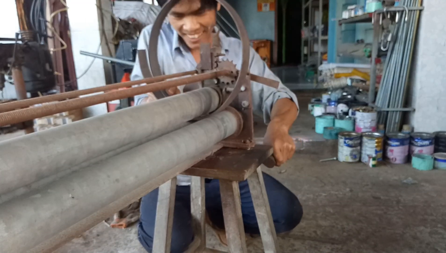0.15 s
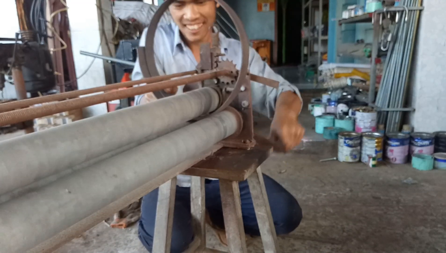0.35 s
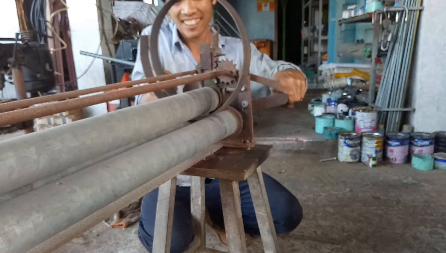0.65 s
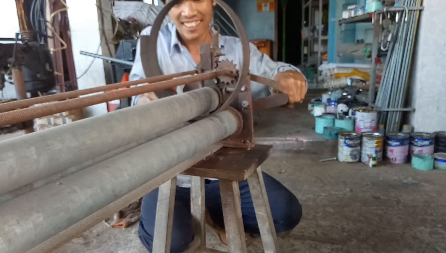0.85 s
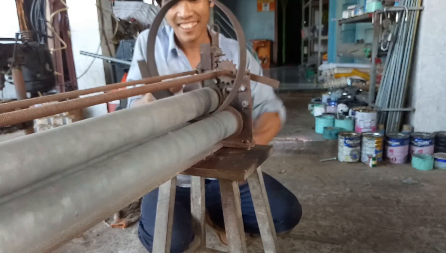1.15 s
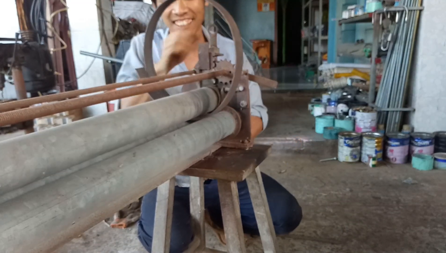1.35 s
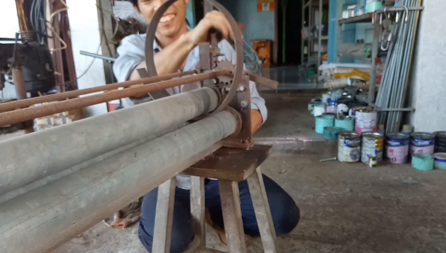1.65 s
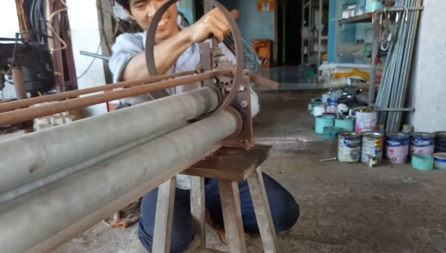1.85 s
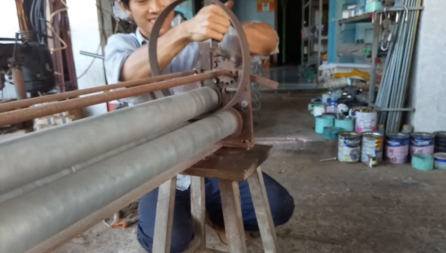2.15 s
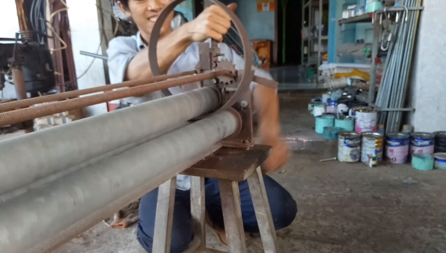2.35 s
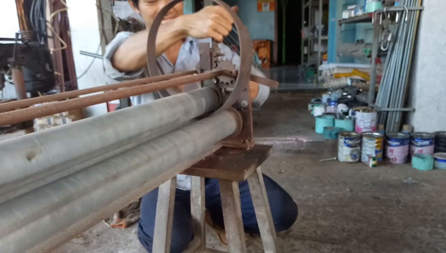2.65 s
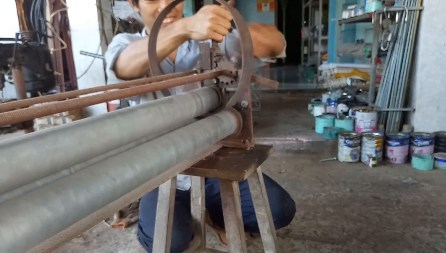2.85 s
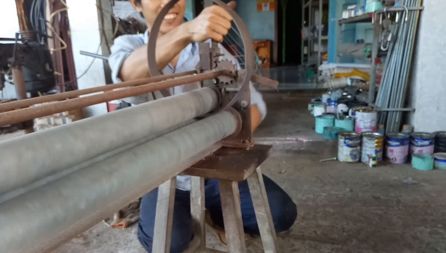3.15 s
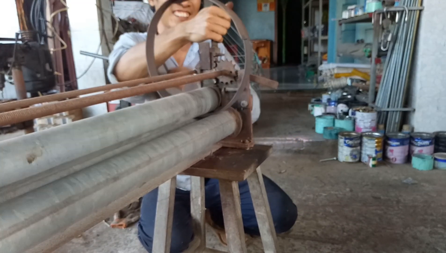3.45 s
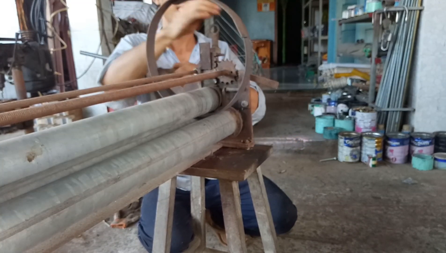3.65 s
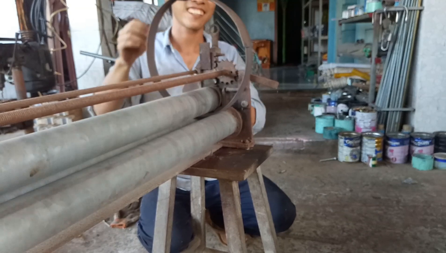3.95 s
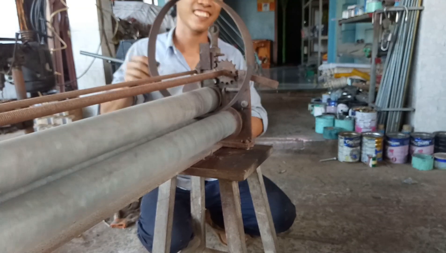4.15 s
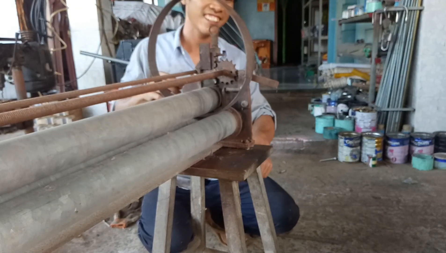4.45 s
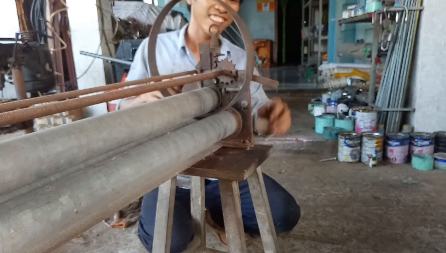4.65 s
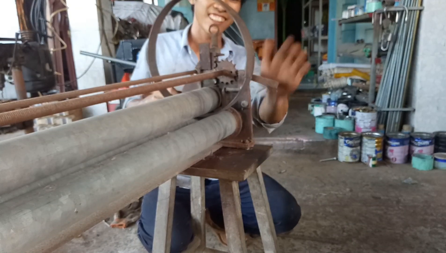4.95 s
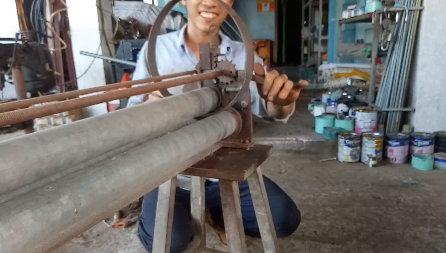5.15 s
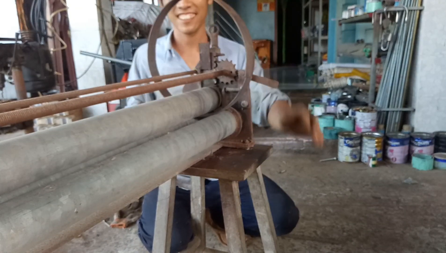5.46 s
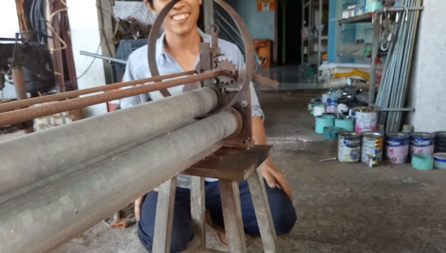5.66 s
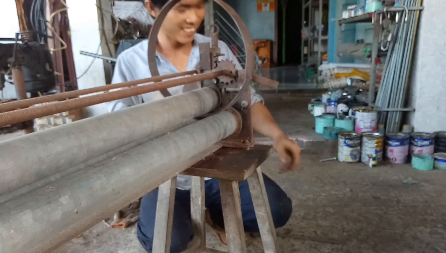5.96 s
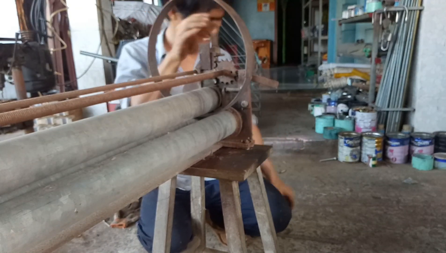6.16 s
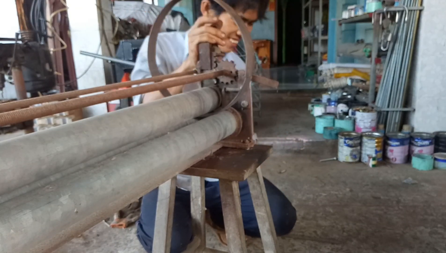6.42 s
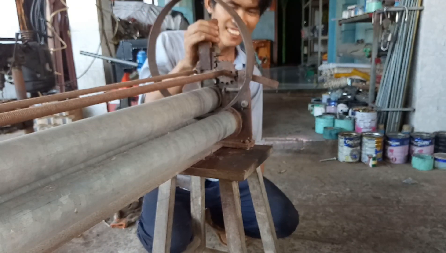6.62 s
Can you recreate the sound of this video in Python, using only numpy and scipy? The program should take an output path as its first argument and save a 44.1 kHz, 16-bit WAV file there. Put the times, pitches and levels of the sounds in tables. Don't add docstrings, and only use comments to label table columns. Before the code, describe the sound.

Close recording of a rusty manual rolling machine: gears slam, rollers jolt and the frame rattles with bright, crowded steel ringing, while the bar grinds in short rough strokes. Heavy low knocks come near the middle, then the action thins out. A final sharp clank at about five seconds leaves long clear tones and light clinks. A faint engine recedes outside the semi-open workshop.

```python
import sys
import numpy as np
from scipy import signal
from scipy.fft import rfft, irfft, next_fast_len
from scipy.io import wavfile
from scipy.ndimage import uniform_filter1d, map_coordinates

SR = 44100
rng = np.random.default_rng(int(sys.argv[2]) if len(sys.argv) > 2 else 0)


def ratio_of_db(decibels):
    return 10 ** (np.asarray(decibels, float) / 20)


def wav_out(sig):
    wavfile.write(sys.argv[1], SR, np.round(np.clip(np.atleast_2d(sig).T, -1, 1) * 32767).astype(np.int16))


N = 299439
TIME = np.arange(N) / SR

# (time [s], level [dB])
STREET_LEVEL = [(0.0, -49.5), (0.89, -52), (1.0, -46), (1.08, -64), (1.32, -45.5), (1.83, -52.5),
                (2.36, -46), (3.19, -53), (3.27, -41.5), (3.99, -56.5), (4.25, -48.5), (4.61, -57.5),
                (5.16, -51), (5.31, -69.5), (5.39, -53), (5.46, -68), (6.18, -55.5), (6.79, -73)]
# (frequency [Hz], density [dB per Hz])
RUMBLE_SPECTRUM = [(12, -44.5), (20, -16.5), (48, -11.5), (90, -1.5), (125, 6.5), (160, 2), (248, -15),
                   (400, -41), (520, -57.5), (880, -120)]
# (frequency [Hz], level [dB])
ENGINE_ORDERS = [(61, -71), (92, -70), (123, -56), (152, -58), (183, -53), (213, -65), (244, -70.5)]
# (frequency [Hz], density [dB per Hz])
RASP_SPECTRUM = [(150, -60), (200, 0), (330, -4), (480, -12), (800, -60)]
# (time [s], level [dB], pitch [Hz], t60 [s])
PANEL_BUZZES = [
    (.5, -59, 335, 1),
    (.74, -55, 332, .5),
    (1.7, -62, 330, .8),
]
# (frequency [Hz], density [dB per Hz])
AIR_SPECTRUM = [(120, -33.5), (200, -21.5), (500, -13), (1100, -19), (1500, -25), (3600, -34), (4480, -9.5),
                (5000, -39.5), (9840, -32.5), (11500, -35.5), (15800, -38.5)]
# (frequency [Hz], t60 [s])
ROOM_DECAY = [(200, 0.75), (2000, 0.44), (5000, 0.51), (12000, 0.37)]

# (time [s], peak [dB], upper resonances [dB])
HANDLE_CHINKS = [
    (5.549, -59.5, 0),
    (5.7712, -59.5, 0),
    (5.875, -53, -3.5),
    (5.986, -51.5, -2.5),
    (6.1022, -59, -1),
    (6.216, -60, -7),
    (6.2667, -69, -11.5),
]
# (frequency [Hz], width [Hz], level [dB])
HANDLE_MODES = [(2075, 90, 2.5), (2150, 120, 0), (2794, 50, -1), (4150, 70, 4)]
# (time [s], peak [dB], pitch [Hz], t60 [s])
SINGING_PARTS = [(.004, -68, 7300, 0.18), (.004, -71, 2050, .3), (.33, -66, 7300, .2),
                 (.867, -26, 4549, .3), (.909, -26, 3790, .25), (.909, -31, 4301, .25),
                 (.93, -32.5, 1669, .26), (1.207, -33.5, 2063, 0.097), (1.325, -33, 1424, 0.093),
                 (2.149, -35, 4300, 0.25), (2.2, -40, 3580, .3), (2.271, -53.5, 5100, 0.27),
                 (2.528, -36, 5800, .06), (2.541, -23.5, 4310, 0.21), (2.626, -25.5, 3682, 0.3),
                 (2.626, -32, 3747, .25), (2.63, -34, 2525, 0.23), (2.63, -32, 6853, 0.22),
                 (5.125, -46, 7700, .4), (3.684, -60, 10300, .1), (3.688, -44.5, 1960, 0.18),
                 (4.316, -36, 2035, 0.14), (4.34, -47, 1669, 0.36), (5.125, -32, 3569, 0.67),
                 (5.126, -34, 4554, .5), (5.125, -33, 4296, 0.32), (5.125, -33, 3219, .34),
                 (5.69, -65, 5700, .1), (.866, -32, 7003, .25), (.875, -33.5, 5750, .1),
                 (2.149, -36.5, 6935, 0.16), (2.983, -36, 5750, 0.22), (3.201, -23, 4300, 0.18),
                 (3.201, -25, 4548, .18), (3.201, -26, 3800, 0.22), (3.203, -32.5, 1670, .3),
                 (4.316, -39, 3128, 0.34), (4.316, -38, 4312, 0.19), (4.316, -41, 3758, 0.13),
                 (5.125, -44, 6200, .5), (3.243, -32.5, 2105, 0.11), (3.245, -36.5, 7000, 0.31),
                 (3.684, -67, 8800, 0.3), (3.684, -54, 10560, 0.1), (5.125, -37.5, 2024, 0.75),
                 (5.124, -37, 2526, 0.5), (5.125, -31, 3790, .48), (5.125, -38, 1646, 0.66),
                 (5.99, -67.5, 3280, 0.94), (6.29, -66, 2507, 0.93)]
# (time [s], level [dB], pitch [Hz], rings for [s])
CHOKED_PARTS = [(.638, -45.5, 2090, 0.011), (.806, -27.5, 3820, 0.012), (.845, -26, 3810, 0.011),
                (1.065, -35, 3580, .025), (1.193, -33, 1750, 0.013), (1.205, -30.5, 2055, 0.025),
                (1.21, -40.5, 4590, 0.072), (1.24, -39.5, 2050, 0.029), (1.326, -26.5, 1400, .012),
                (2.151, -38, 3830, 0.038), (2.474, -33.5, 4300, 0.027), (2.697, -24.5, 3580, 0.034),
                (2.752, -29, 3600, 0.025), (2.783, -36.5, 2050, 0.013), (2.979, -26.5, 1710, 0.023),
                (3.008, -30.5, 2050, 0.018), (2.982, -30.5, 2550, .022), (3.008, -27, 2550, .05),
                (3.057, -33, 1690, .025), (3.128, -33, 3575, 0.024), (3.25, -26.5, 2080, 0.043),
                (4.045, -51, 2700, 0.022), (4.047, -50, 3800, .01), (5.17, -33, 2030, .12),
                (5.22, -38, 2530, .1), (5.18, -37.5, 1685, 0.044), (5.2, -33, 3795, 0.065)]
# (time [s], peak [dB], pitch [Hz], t60 [s])
PIPE_KNOCKS = [(0.453, -28, 880, 0.033), (0.515, -46, 1047, 0.062), (1.128, -20, 887, 0.019),
               (1.322, -22.5, 1088, 0.078), (1.326, -33.5, 641, 0.13), (5.108, -39.5, 332, .2),
               (5.11, -35.5, 617, .2), (1.6, -44, 320, 0.15), (2.038, -33.5, 598, 0.09),
               (2.228, -17, 473, 0.034), (2.457, -12.5, 653, 0.021), (3.525, -38, 1024, 0.058),
               (3.683, -26.5, 936, 0.031), (3.94, -53, 813, 0.11), (4.04, -28.5, 1050, 0.038),
               (4.18, -48, 596, 0.074), (4.243, -41, 620, .06), (4.245, -40, 940, 0.062),
               (4.316, -39.5, 849, 0.13), (4.318, -45, 512, 0.15), (4.509, -41, 1000, 0.056)]

HOOP_TONES = [1268, 1307, 3576]
# (time [s], lowest tone [dB], middle tone [dB], top tone [dB], t60 of the lowest [s])
HOOP_SHAKES = [(0.42, -53, -62, -79.5, .8), (0.737, -41, -49, -53, .35), (0.917, -32, -38, -39.5, 0.52),
               (1.013, -36, -56.5, -58.5, 1.6), (1.135, -40, -62, -53, 2.2), (1.222, -40, -54, -62, 1.1),
               (1.333, -43, -58, -63.5, 1.8), (1.6, -48, -80, -61.5, 0.77), (1.908, -57, -55.5, -63, 0.86),
               (2.093, -49, -56, -51, .4), (2.36, -43, -49, -62, .4), (2.549, -47.5, -37, -37.5, 1.3),
               (2.63, -32, -50, -39, 0.29), (2.79, -43.5, -42, -45, 1.1), (2.965, -50, -41, -41, 1.7),
               (3.108, -43.5, -53, -42, 1.6), (3.268, -43, -33, -45, 1.04), (3.412, -46.5, -38.5, -64, 1.2),
               (3.5, -51, -64, -68, 6.7), (3.847, -51, -89.5, -63.5, 4.1), (4.053, -58.5, -90, -90.5, 0.97),
               (4.25, -47, -47.5, -75, 1.9), (4.313, -51, -43.5, -58, 1.53), (4.51, -50.5, -57, -79, 1.12),
               (4.904, -66.5, -86.5, -100, 2.6), (5.123, -53, -50.5, -38, 1.37),
               (5.183, -36, -60, -55.5, 0.55), (5.301, -49.5, -48.5, -56, 2.03)]
# (time [s], level [dB], t60 [s])
HOOP_NUDGES = [
    (5.46, -46, 1.27),
    (5.72, -56, 1.26),
    (5.828, -52.5, 1.46),
    (6.13, -64, 0.87),
    (6.23, -61.5, 3.4),
    (6.5, -71, 9.6),
]
# (time [s], t60 [s])
HOOP_GRIPS = [
    [(3.75, .5)],
    [(3.683, 0.33), (5.66, 0.46)],
]

# (start [s], length [s], effort [dB], weight on the stand [dB], slip [dB])
CRANK_PUSHES = [(0.367, 0.059, -69, 11, 4), (0.422, 0.028, -59, 4.5, 0), (0.575, 0.1, -59.5, -23, -2),
                (0.752, 0.0057, -37.5, -8.5, 8.5), (0.91, 0.054, -35.5, -18, 1.5),
                (1.083, 0.27, -45.5, -3.5, 7.5), (1.493, 0.16, -56, -3, -13.5), (1.875, 0.048, -53, -25, 2),
                (1.973, 0.076, -44, -2, 1.5), (2.132, 0.57, -48, 5, 4.5), (2.57, 0.055, -40.5, 4, 6),
                (2.83, 0.15, -47, 4.5, 4), (3.002, 0.048, -33, -8.5, 4), (3.112, 0.16, -44, 4, 0),
                (3.26, 0.04, -32.5, -13, -6), (3.45, 0.11, -51.5, -4, 1), (3.856, 0.13, -59, -9, 1),
                (4.07, 0.35, -54, -15, 1.5), (4.55, 0.053, -62, -9, 7), (5.213, 0.038, -41.5, -33, -19),
                (5.361, 0.073, -64.5, -15, -23), (5.747, 0.084, -66.5, -2.5, 1.5),
                (3.704, 0.089, -59, -13.5, -21), (1.336, 0.074, -58, 9, -5)]
PIPE_SHARE = [-2, -2, -3, -0.7, -2.5, 0.1, -0.5, -3, 0.1, 4.1, 2.5, 0.5, -1.3, -.1, -1.5, 0, -16, -4, -2.5,
              0.2, 4, -5, 5.5, -2]
# (over the effort [dB], at rest [dB], rise [dB/s], fall [dB/s])
GRINDING_PARTS = [
    (1.5, -75.5, 301, 130.5),
    (-1, -84, 148, 100),
    (-7.5, -83.5, 296, 123.5),
    (-0.5, -81, 252, 96.5),
]

STEEL_MODES = [1424, 1670, 1710, 1980, 2030, 2086, 2220, 2526, 2990, 3220, 3790, 3827, 3926, 4000, 4300,
               4548, 4615, 5280, 6164, 6848, 6935, 7003, 7300, 8775]
STEEL_LEVELS = [-8.5, -7.5, -11.5, -13.5, -7.5, -9, -19.5, -7, -12.5, -21, -7, -5, -8, -17, -5.5, -12, -7.5,
                -29.5, -8.5, -11.5, -10.5, -14, -15, -23]
# (frequency [Hz], density [dB per Hz])
CLATTER_SPECTRUM = [(120, -39), (200, -16), (439, -22.5), (930, -14), (1200, -11.5), (1290, -3), (1520, -7),
                    (2040, -4), (2940, -7), (3800, -6), (4650, -6.5), (5190, -14), (7080, -17),
                    (10200, -19.5), (15800, -52.5)]
# (frequency [Hz], t60 [s])
CLATTER_DECAY = [(300, 0.45), (1500, 0.12), (4500, 0.14), (9000, 0.12), (15000, 0.3)]

# (time [s], peak [dB], bright edge [dB], loudest note [Hz])
SLACK_SNAPS = [
    (0.092, -48.5, -25, 3780),
    (0.171, -35.5, -36, 2690),
    (0.9855, -13, -19.5, 3620),
    (3.6828, -27.5, -29, 1970),
    (4.041, -41.5, -16.5, 2800),
    (5.689, -39, -18, 3830),
    (1.508, -49, -17, 3560),
    (3.105, -30.5, -18, 1690),
]
GEAR_CLANKS = [
    (0.004, -50.5, -10, 3810),
    (0.8633, -8.5, -2, 4550),
    (0.9073, -7.5, -8.5, 3770),
    (1.182, -24, -14.5, 1744),
    (2.54, -10, -13, 4330),
    (2.6239, -9.5, -11, 3880),
    (2.7545, -24.5, -17, 3690),
    (2.7, -27.5, -19, 3520),
    (4.4992, -37, -20, 1905),
    (5.1246, -10, -11.5, 3644),
]
ROLLER_JOLTS = [(0.4337, -30.5, -24, 1924), (0.8436, -17.5, -9, 3876), (.852, -22, -9.5, 3935),
                (1.1307, -24.5, -16.5, 3410), (2.001, -25, -14.5, 1860), (2.0422, -26, -32.5, 2036),
                (2.1474, -21.5, -3, 4130), (2.386, -26, -15.5, 1730), (2.4717, -15.5, -19, 2150),
                (2.579, -17.5, -10.5, 4160), (2.6439, -15, -16, 3580), (2.8612, -34.5, 2, 4150),
                (2.8862, -29.5, -16, 4150), (2.9785, -16.5, -7.5, 1714), (2.9867, -17, -8.5, 2586),
                (3.2002, -9, -9, 3953), (3.243, -12, -9.5, 2020), (3.5261, -40.5, -14.5, 3570),
                (3.59, -46, -9, 3700), (4.314, -22, -15.5, 1893), (4.5477, -43.5, -25, 3770),
                (5.1067, -6.5, -17, 4503)]
LOOSE_TICKS = [(0.6249, -47, -15, 3760), (0.6396, -41, -6.5, 2090), (0.6608, -38.5, -6.5, 4360),
               (0.735, -32.5, -11.5, 3900), (1.9531, -37, -13, 2050), (2.834, -31, -17, 1300),
               (3.008, -24, -11.5, 2050), (3.025, -21.5, -8, 4600), (0.7206, -32, -9.5, 2044),
               (0.753, -30, -10, 3910), (1.9421, -34, -12, 1990), (1.983, -35, -7, 4570),
               (2.195, -40.5, -14.5, 3600), (1.2077, -24.5, -13.5, 2063), (1.903, -44.5, -7, 1920),
               (1.9257, -37.5, -9.5, 1980), (2.112, -30.5, 1, 1950), (2.4267, -30, -14.5, 1900),
               (3.281, -24, -18, 1863), (3.294, -20, -14, 4550), (4.242, -31, -22, 2044),
               (4.789, -54.5, -11, 4700)]
STAND_BUMPS = [
    (.52, -46.5, -5.5, 1940),
    (1.5479, -53, -25.5, 3510),
    (1.6083, -47.5, -11.5, 3840),
    (1.95, -41.5, -8, 1940),
    (2.226, -28, -40.5, 3533),
    (2.2707, -28.5, -26, 2230),
    (2.4585, -26.5, -17, 1610),
    (3.1869, -28, -9.5, 2030),
]
PRESSED_STOPS = [(0.4211, -38, -30.5, 2770), (0.4542, -23, -12, 2100), (0.8045, -15.5, -18, 1800),
                 (0.818, -25, -21.5, 3800), (2.72, -24.5, -19.5, 3600), (0.84, -24, -6.5, 3820),
                 (1.324, -13, -21.5, 4510), (4.138, -36, -29.5, 1700), (5.0975, -15.5, -23, 3686),
                 (2, -31.5, -19.5, 1900), (2.9344, -31.5, -19.5, 3900), (3.1713, -27.5, -15, 2900),
                 (2.6, -30.5, -19, 2500), (2.9, -37.5, -20, 1700), (2.07, -31.5, -19.5, 2100)]
# (low knock [dB], ringing [dB])
CONTACT_KINDS = [
    (-30, -8),
    (-30, 1),
    (-18, -3),
    (-22, 3),
    (0.5, 4.5),
    (-15, -10.5),
]


def unit(x):
    return x / np.sqrt(np.mean(x ** 2) + 1e-20)


def evened(x):
    return x / np.sqrt(abs(uniform_filter1d(x ** 2, size=3000)) + 1e-20)


def along(points, hz):
    f, value = np.transpose(points)
    return np.interp(np.log(hz + 1), np.log(f + 1), value)


def wobble(rate):
    knots = rng.standard_normal(int(N * rate / SR) + 4)
    return map_coordinates(knots, [np.arange(N) * rate / SR])


def shiver(rate):
    knots = rng.standard_normal(int(N * rate / SR) + 2)
    return np.interp(np.arange(N) * rate / SR, np.arange(len(knots)), knots)


def coloured(x, gain):
    m = next_fast_len(N + 8192)
    return irfft(rfft(x, m) * gain(np.fft.rfftfreq(m, 1 / SR)), m)[:N]


def noise(spectrum):
    return unit(coloured(rng.standard_normal(N), lambda hz: ratio_of_db(along(spectrum, hz))))


def train(s, size):
    return np.bincount(np.round(s * SR).astype(int), size, N)[:N]


def ring(x, hz, t60):
    r = ratio_of_db(-60 / (t60 * SR))
    w = 2 * np.pi * hz / SR
    return signal.lfilter([0, np.sin(w)], [1, -2 * r * np.cos(w), r * r], x)


def fade(x, t60, rise):
    soft = np.exp(-1 / (rise * SR))
    dying = ratio_of_db(-120 / (t60 * SR))
    return signal.lfilter([1 - soft], np.convolve([1, -dying], [1, -soft]), x)


def notes(s, db, hz, t60):
    out = np.zeros(N + SR)
    for at, peak_db, pitch, life in zip(s, db, hz, t60):
        t = np.arange(int(min(life, 1) * SR)) / SR
        shape = ratio_of_db(peak_db - 60 * t / life) * (1 - np.exp(-t / 0.0034))
        out[round(at * SR):][:len(t)] += shape * np.sin(2 * np.pi * pitch * t)
    return out[:N]


def street():
    level_db = np.interp(TIME, *np.transpose(STREET_LEVEL))
    rumble = ratio_of_db(level_db - 3.5) * unit(noise(RUMBLE_SPECTRUM) * ratio_of_db(0.99 * wobble(6.3)))
    engine = ratio_of_db(-69) * noise(RASP_SPECTRUM)
    for hz, db in ENGINE_ORDERS:
        engine += ratio_of_db(db + 3.5 * wobble(8)) * np.sin(2 * np.pi * hz * TIME + wobble(6))
    leaving = ratio_of_db(-14 * np.clip(TIME - 3, 0, None))
    return rumble + leaving * engine + notes(*np.transpose(PANEL_BUZZES))


def open_air():
    hush_db = 9 * np.clip(TIME - 6.4, 0, None)
    return ratio_of_db(-73 - hush_db) * noise(AIR_SPECTRUM)


def room(x):
    hz, t, z = signal.stft(rng.standard_normal(SR), SR, nperseg=256)
    dying = ratio_of_db(-60 * t / along(ROOM_DECAY, hz)[:, None])
    tail = signal.istft(z * dying, SR, nperseg=256)[1]
    late = np.pad(x, (300, 0))
    return signal.fftconvolve(late, tail / np.linalg.norm(tail))[:N]


def handle():
    s, db, upper_db = np.transpose(HANDLE_CHINKS)
    out = np.zeros(N)
    for hz, width_hz, level in HANDLE_MODES:
        hits = train(s, ratio_of_db(2 * (db + level + upper_db * (hz > 3500) - 8.5)))
        resonance = unit(ring(rng.standard_normal(N), hz, 2.26 / width_hz))
        out += resonance * np.sqrt(abs(fade(hits, 0.34, rise=0.0023)))
    return out


def singing_parts():
    return sum(notes(*np.transpose(SINGING_PARTS[k::4])) * (1 + 0.4 * shiver(120)) for k in range(4))


def choked_parts():
    attack_s, choke_s, sag_t60 = 0.003, 0.0037, 0.27
    out = np.zeros(N + SR)
    for at, db, hz, length in CHOKED_PARTS:
        t = np.arange(int((length + 0.04) * SR)) / SR
        held = (1 - np.exp(-t / attack_s)) * ratio_of_db(-60 * t / sag_t60)
        stopped = np.exp(-np.clip(t - length, 0, None) / choke_s)
        out[round(at * SR):][:len(t)] += ratio_of_db(db) * held * stopped * np.sin(2 * np.pi * hz * t)
    return out[:N]


def pipe_knocks():
    s, db, hz, t60 = np.transpose(PIPE_KNOCKS)
    return notes(s, db - 2.5, hz, t60) + notes(s, db - 5.5, 1.13 * hz, 1.05 * t60)


def hoop():
    hum_db, choke_s = -86, 0.026
    upper_t60 = (0.93, 1.196)
    s, low_db, *upper_db, held = np.transpose(HOOP_SHAKES)

    def swell(age):
        return 1 - np.exp(-age / 0.013)

    at, db, t60 = np.transpose([(0, hum_db, 1), *zip(s, low_db, held), *HOOP_NUDGES])
    last = np.searchsorted(at, TIME, side="right") - 1
    age = TIME - at[last]
    left = np.append(at[1:], 99)[last] - TIME
    dying = ratio_of_db(db[last] - 60 * age / t60[last])
    sizes = [swell(age) * dying * (1 - np.exp(-left / choke_s)) + ratio_of_db(hum_db)]

    coarse = TIME[::64]
    age = np.clip(coarse - s[:, None], 0, None)
    for db, t60, grips in zip(upper_db, upper_t60, HOOP_GRIPS):
        damped = 0
        for grip, life in grips:
            damped = damped + (s[:, None] < grip) * np.clip(s[:, None] + age - grip, 0, None) / life
        power = (swell(age) * ratio_of_db(db[:, None] - 60 * (age / t60 + damped))) ** 2
        sizes.append(np.interp(TIME, coarse, np.sqrt(power.sum(axis=0))))
    throb_db = 2.5 * np.sin(2 * np.pi * 12 * TIME + 2 * wobble(4))
    sizes[2] = sizes[2] * ratio_of_db(throb_db) * (1 + 0.3 * shiver(90))

    out = np.zeros(N)
    for size, hz in zip(sizes, HOOP_TONES):
        out += size * ratio_of_db(4 + 1.4 * wobble(25)) * np.sin(2 * np.pi * hz * TIME + 0.5 * wobble(11))
    return out


def effort():
    s, length, db, weight_db, slip_db = np.transpose(CRANK_PUSHES)[..., None]
    shares_db = [np.array(PIPE_SHARE)[:, None], weight_db, slip_db, 0]
    t = np.arange(0, N + 256, 256) / SR
    out = []
    for (over_db, rest_db, rise, fall), own_db in zip(GRINDING_PARTS, shares_db):
        shape_db = -rise * np.clip(s - t, 0, None) - fall * np.clip(t - s - length, 0, None)
        power = ratio_of_db(2 * rest_db) + ratio_of_db(2 * (db + over_db + own_db + shape_db)).sum(axis=0)
        out.append(np.interp(TIME, t, 10 * np.log10(power)))
    return out


def crowded(depth_db):
    def modes(f):
        gain = 1
        for hz, db in zip(STEEL_MODES, STEEL_LEVELS):
            gain = gain + ratio_of_db(db + 8.5) / (1 + ((f - hz) / (0.011 * hz)) ** 2)
        return gain

    z = signal.stft(coloured(noise(CLATTER_SPECTRUM), modes), nperseg=512)[2]
    patches = uniform_filter1d(rng.standard_normal(z.shape), size=2, axis=0)
    patches = uniform_filter1d(patches, size=24, axis=1)
    return unit(signal.istft(z * ratio_of_db(depth_db * unit(patches)), nperseg=512)[1][:N])


def grinding():
    bands = [(1300, 3000), (200, 1000), (5000, 16000), (3000, 5000)]  # pipes, stand, scale, gears, Hz
    steel = crowded(depth_db=3.5)
    out = np.zeros(N)
    for db, (lo, hi) in zip(effort(), bands):
        clumps = ratio_of_db(3.6 * shiver(40) + 3 * shiver(400))
        grit = coloured(steel * clumps, lambda f: 1 / (1 + (lo / (f + 1)) ** 10) / (1 + (f / hi) ** 10))
        out += ratio_of_db(db - 4) * evened(grit)
    return out


def blows():
    kinds = [SLACK_SNAPS, GEAR_CLANKS, ROLLER_JOLTS, LOOSE_TICKS, STAND_BUMPS, PRESSED_STOPS]
    out = []
    for rows, (low_db, ring_db) in zip(kinds, CONTACT_KINDS):
        out += [(s, db, low_db, bright_db, hz, ring_db) for s, db, bright_db, hz in rows]
    return np.transpose(out)


def tint(hz, low_db, bright_db):
    low = np.clip(np.log2(1600 / hz) / 0.47, 0, 1)
    bright = np.clip(np.log2(hz / 4700) / 0.5, 0, 1)
    return low * (low_db + 20.5) + bright * (bright_db + 13.5)


def rollers():
    s, db, low_db, bright_db, note, ring_db = blows()
    slips = rng.random(N // 100) * (N - 1) / SR
    slip_db = effort()[-1][(slips * SR).astype(int)]
    out = np.zeros(N)
    for hz, level in zip(STEEL_MODES, STEEL_LEVELS):
        near_db = 8 * np.exp(-(np.log2(hz / note) / 0.1) ** 2)
        scatter_db = 2 * rng.standard_normal(len(s))
        size = ratio_of_db(db + ring_db + near_db + tint(hz, low_db, bright_db) + scatter_db - 26)
        hits = train(s, size * rng.choice([-1, 1], len(s)))
        rattle = train(slips, ratio_of_db(slip_db - 24) * rng.standard_normal(len(slips)))
        tone = ring(hits + rattle, hz, t60=0.3 if hz < 5000 else 0.18)
        out += ratio_of_db(level) * tone * (1 + 0.34 * shiver(110))
    return out + notes(s, db + ring_db - 7.5, note, np.full(len(s), 0.07))


def clatter():
    s, db, low_db, bright_db, note, _ = blows()
    steel = rfft(crowded(depth_db=4.5))
    f = np.fft.rfftfreq(N, 1 / SR) + 1
    density = ratio_of_db(along(CLATTER_SPECTRUM, f))
    out = np.zeros(N)
    for hz in np.geomspace(250, 16000, num=13):
        shape = np.cos(np.pi / 2 * np.clip(2 * np.log2(f / hz), -1, 1)) ** 2
        level = np.sqrt(np.sum((shape * density) ** 2) / np.sum(density ** 2))
        near_db = 4.06 * np.exp(-(np.log2(hz / note) / 0.66) ** 2)
        hits = train(s, ratio_of_db(2 * (db + tint(hz, low_db, bright_db) + near_db - 2.5)))
        crack = 0.75 * (1 + (hz / 7000) ** 2) * fade(hits, 0.01, rise=0.0002)
        body = 0.68 * fade(hits, 0.057, rise=0.00077)
        tail = 0.26 * fade(hits, along(CLATTER_DECAY, hz), rise=0.0021)
        out += level * evened(irfft(steel * shape, N)) * np.sqrt(abs(crack + body + tail))
    return ratio_of_db(-7.5) * out


def scene():
    background = street() + open_air()
    machine = handle() + singing_parts() + choked_parts() + pipe_knocks() + rollers() + clatter()
    return (background + ratio_of_db(-6.5) * room(machine) + hoop() + grinding() + machine)[None]


def suppressed(x, strength, memory, floor_db):
    z = signal.stft(x, nperseg=512)[2]
    power = uniform_filter1d(abs(z) ** 2, size=7, axis=0)
    power = uniform_filter1d(power, size=3, axis=1) + 1e-20
    keep = np.exp(-256 / (memory * SR))
    past = signal.lfilter([1 - keep], [1, -keep], power)
    gain = np.sqrt(np.clip(1 - strength * past / power, ratio_of_db(2 * floor_db), 1))
    return signal.istft(z * gain, nperseg=512)[1][:N]


def band_limit(x):
    return signal.sosfilt(signal.butter(12, 15990, fs=SR, output="sos"), x)


def record(dry):
    clean = suppressed(dry[0], strength=0.014, memory=0.22, floor_db=-7)
    clean = clean / (1 + abs(clean / 0.5) ** 3) ** (1 / 3)
    mix = coloured(clean, lambda hz: hz < 15600)[None]
    return band_limit(mix)


dry = scene()
out = record(dry)
wav_out(out)
```